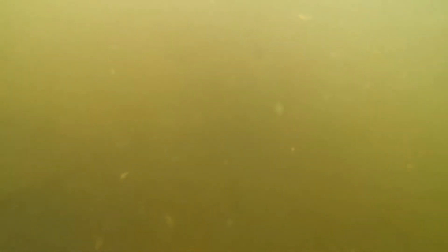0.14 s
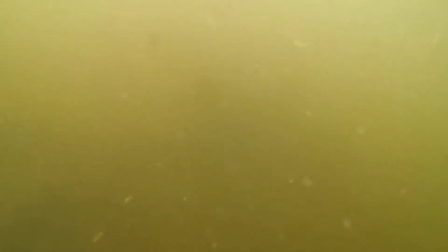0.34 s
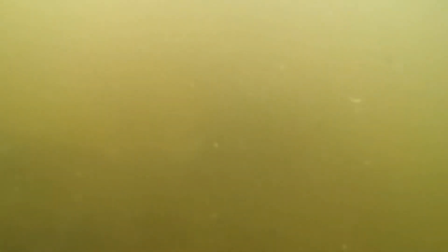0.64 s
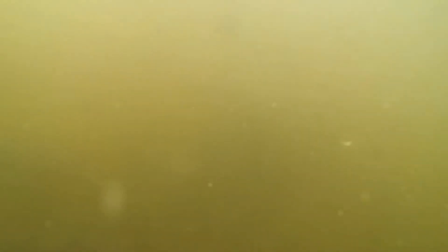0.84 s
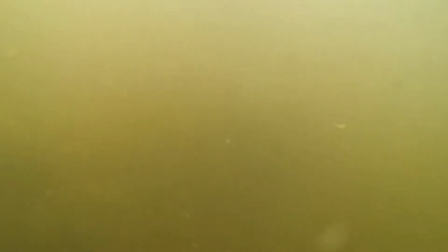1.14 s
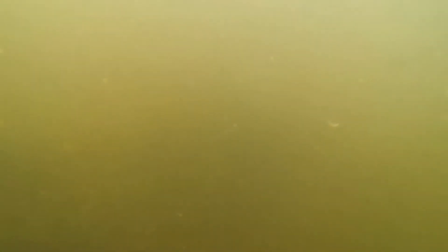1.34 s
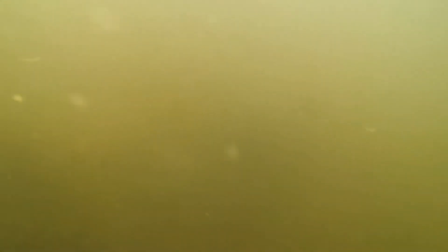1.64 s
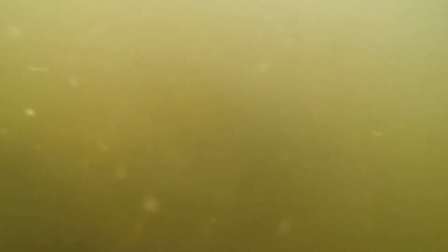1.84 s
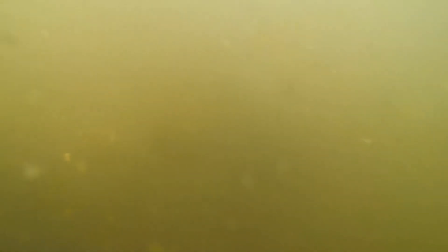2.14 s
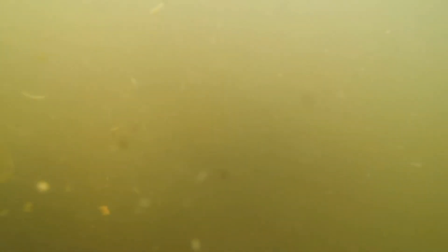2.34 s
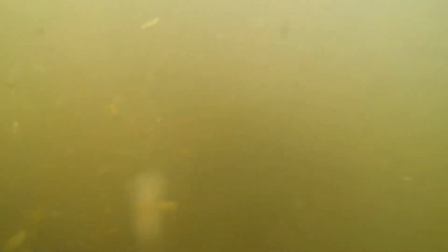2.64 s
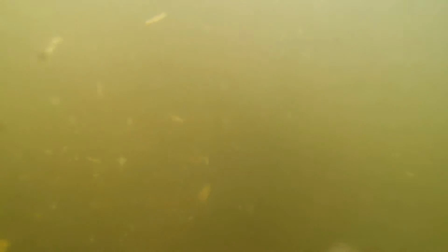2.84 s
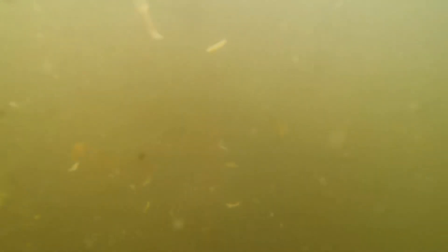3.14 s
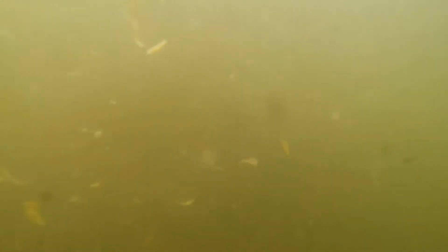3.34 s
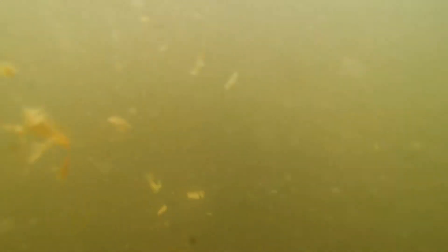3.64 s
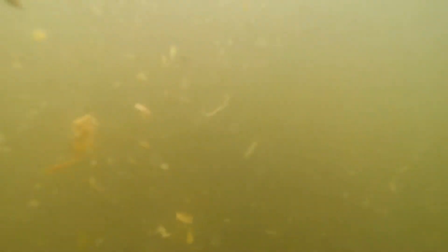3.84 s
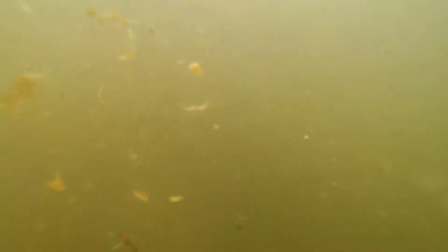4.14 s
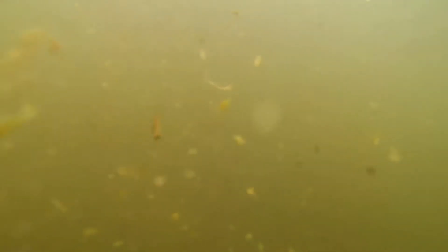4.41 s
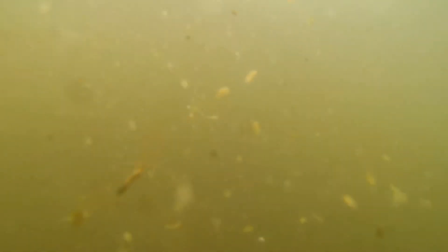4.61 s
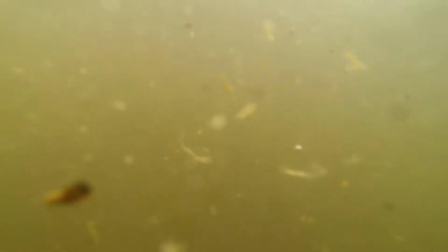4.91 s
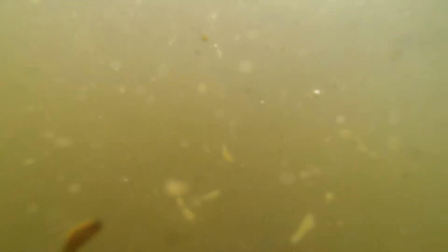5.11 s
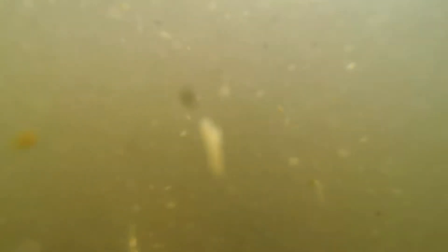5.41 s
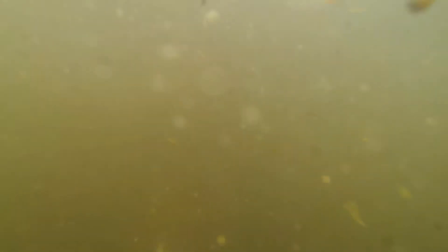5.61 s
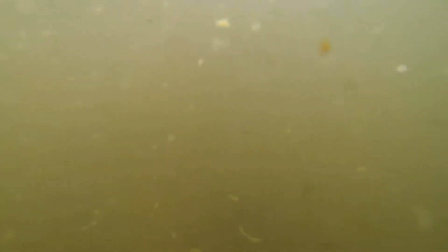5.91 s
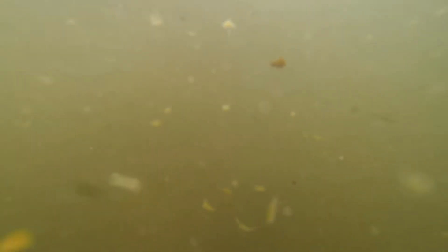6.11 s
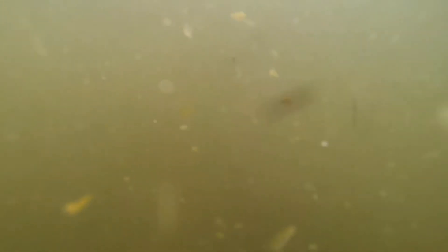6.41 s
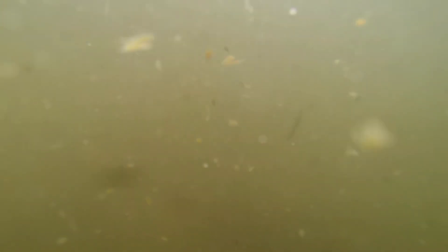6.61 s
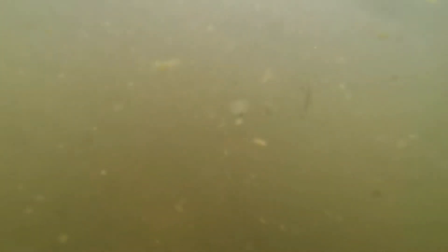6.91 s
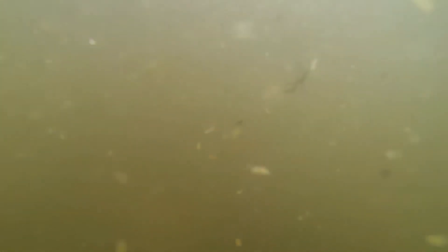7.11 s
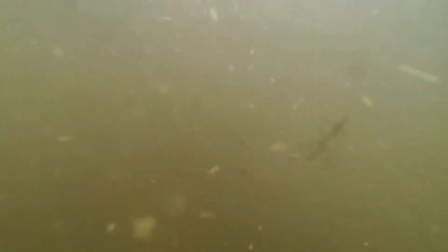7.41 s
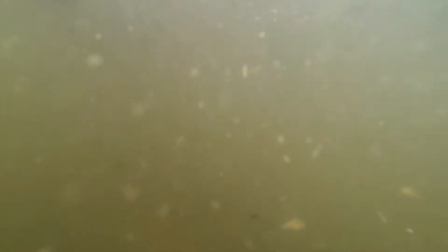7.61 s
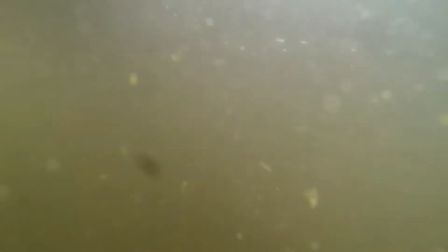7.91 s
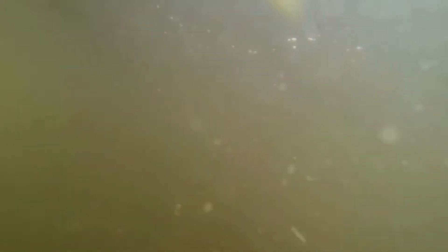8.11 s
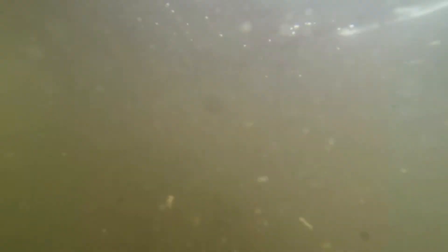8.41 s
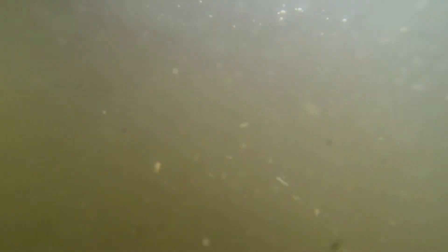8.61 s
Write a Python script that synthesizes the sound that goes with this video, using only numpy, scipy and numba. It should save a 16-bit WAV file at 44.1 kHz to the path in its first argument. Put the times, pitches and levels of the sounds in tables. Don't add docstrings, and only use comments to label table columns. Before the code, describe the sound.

Underwater, a motor-driven cutter whines and grinds harshly in a short burst, stalls, restarts for a long uneven run, then leaves engine throb and clicks.

```python
import sys
import numpy as np
from scipy import signal
from scipy.fft import rfft, irfft
from scipy.io import wavfile
from scipy.ndimage import uniform_filter1d
from numba import njit

SR = 44100
rng = np.random.default_rng(int(sys.argv[2]) if len(sys.argv) > 2 else 0)


def gain_from_decibels(decibels):
    exponent = np.asarray(decibels, float) / 20
    return 10 ** exponent


def store_pcm(level_fs):
    pcm = np.round(np.clip(level_fs, -1, 1) * 32767).astype(np.int16)
    wavfile.write(sys.argv[1], SR, np.atleast_2d(pcm).T)


N = 385875
TIME = np.arange(N) / SR
LONG_CUT_S = 3


def level(x, db):
    return x * gain_from_decibels(db) / np.sqrt(np.mean(x ** 2))


def band(x, lo_hz, hi_hz):
    return signal.sosfilt(signal.butter(3, [lo_hz, hi_hz], "bandpass", fs=SR, output="sos"), x)


def fine(x):
    return np.repeat(x, repeats=16)[:N]


def wander(rate_hz):
    held = np.repeat(rng.standard_normal(int(N / SR * rate_hz) + 2), 4)
    soft = uniform_filter1d(uniform_filter1d(held, size=4), size=4)
    return 1.3 * np.interp(TIME[::16] * rate_hz * 4, np.arange(len(soft)), soft)


def walk(rate_hz):
    return fine(wander(rate_hz))


def hump(start_s, length_s):
    out, k = np.zeros(N), int(length_s * SR)
    out[int(start_s * SR):][:k] = np.sin(np.pi * np.arange(k) / k)
    return out


def play(tables):
    rows = np.concatenate(tables)
    gate = sum((TIME >= t[0][0]) & (TIME < t[-1][0]) for t in tables)
    return uniform_filter1d(1. * gate, 200), [np.interp(TIME, rows[:, 0], c) for c in rows.T[1:]]


@njit
def svf(x, hz, width):
    y, b, l = np.empty(len(x)), 0., 0.
    for i in range(len(x)):
        g, k = np.pi * hz[i] / SR, width / hz[i]
        g = g + g ** 3 / 3 + 2 * g ** 5 / 15 + 17 * g ** 7 / 315
        v = (b + g * (x[i] - l)) / (1 + g * (g + k))
        b, l, y[i] = 2 * v - b, l + 2 * g * v, k * v
    return y


def ring(x, modes, drift, sway_db):
    total = 0
    for k, (hz, width, db) in enumerate(modes):
        strength = fine(gain_from_decibels(db + sway_db * wander(2.92)))
        total = total + (-1) ** k * strength * svf(x, hz * (1 + drift * walk(2.05)), 1. * width)
    return level(total, 0)


def grit(rate_hz, spread_db, smooth_db):
    hit = rng.random(N) < rate_hz / SR
    size = np.minimum(rng.exponential(size=N), 5)
    noise = rng.standard_normal(N)
    impacts = level(hit * np.sign(noise) * gain_from_decibels(spread_db * size), 0)
    return level(impacts + gain_from_decibels(smooth_db) * noise, 0)


# pitch_hz, density_db (per Hz)
MIC_NOISE = [(180, -43), (300, -7.5), (420, -3.5), (650, -4.5), (980, -17), (2760, -14), (7000, -25.5),
             (15300, -31.5)]


def circuit():
    hz, db = np.transpose(MIC_NOISE)
    shape = gain_from_decibels(np.interp(np.log(np.fft.rfftfreq(N, 1 / SR) + 1), np.log(hz), db))
    noise = irfft(rfft(rng.standard_normal(N)) * shape, N)
    frame_hz, noise_db = 29.97, -76
    frames = np.exp(1.4 * (np.cos(2 * np.pi * (frame_hz * TIME + .2)) - 1))
    frames = frames * np.clip(walk(150) + 0.32, 0, 3)
    crackle = frames * (band(noise, 7000, 7300) + 1.5 * band(noise, 10700, 13000))
    return (noise + 1.6 * crackle) * gain_from_decibels(noise_db - 1.5) / np.std(band(noise, 8300, 16000))


# peak_s, peak_db
WATER_SURGES = [(0, -37), (0.97, -36), (1.49, -31), (1.9, -43), (3.09, -41), (3.85, -42), (4.82, -42.5),
                (5.38, -34.5), (5.8, -44), (6.07, -44), (7.6, -44), (7.99, -43), (8.43, -30), (8.76, -24)]
# centre_hz, width_hz, level_db
FAR_HISS_BEFORE = [(700, 360, 8.5), (1700, 500, 4.5), (2900, 1600, 3), (5000, 2000, -18.5)]
FAR_HISS_AFTER = [(700, 570, -9.5), (1400, 150, -6), (1680, 140, -3), (2565, 170, -4), (2820, 154, 2.5),
                  (3310, 240, 0), (4160, 900, -13), (5135, 170, 0), (6510, 410, -15)]


def water():
    t = TIME[::16]
    swell_db_s, ebb_db_s = 153, 111
    surge = 0
    for peak_s, db in WATER_SURGES:
        slope = np.where(t < peak_s, swell_db_s, ebb_db_s)
        surge = surge + gain_from_decibels(db - slope * np.abs(t - peak_s))
    calm_db, duck_db = -48, -7.5
    calm = gain_from_decibels(calm_db + duck_db * play(MOTOR_RUNS)[0])
    slosh = level(band(rng.standard_normal(N), 16, 50), 0) * (fine(surge) + calm)
    rumble = level(band(rng.standard_normal(N), 60, 222), -58)
    before = gain_from_decibels(-68.5) * ring(grit(1500, 2.8, 3), FAR_HISS_BEFORE, 0.019, 2.1)
    before *= np.clip(TIME / 0.39, 0, 1) ** 2
    after = gain_from_decibels(-55.5) * ring(grit(1500, 2.8, 3), FAR_HISS_AFTER, 0.019, 2.1)
    return slosh + rumble + np.where(TIME < LONG_CUT_S, before, after) * gain_from_decibels(1.1 * walk(10))


# time_s, level_db
ENGINE_LEVEL = [
    (0, -62),
    (1.899, -55.5),
    (5.5, -55),
    (8.75, -49),
]
# share_of_turn, level_db
ENGINE_FIRINGS = [(.0, -4), (.11, -2.5), (.4, -10.5), (0.582, 5.5), (0.786, 5.5)]


def idling():
    s, db = np.transpose(ENGINE_LEVEL)
    turns_hz = np.where(TIME < LONG_CUT_S, 24.0, 28.778)
    turns = np.cumsum(turns_hz) / SR + .3 + .001 * walk(6)
    kicks = 0
    for at, size_db in ENGINE_FIRINGS:
        kicks = kicks + gain_from_decibels(size_db + .4 * walk(20)) * np.diff(np.floor(turns - at), prepend=-1)
    t = np.arange(-300, 600) / SR
    peak = np.exp(-t / 0.0026) * np.cos(2 * np.pi * 200 * t)
    dip = 0.63 * np.exp(-t / 0.0022) * (1 - np.exp(-t / 0.00018))
    pulse = np.where(t < 0, np.exp(t / 0.00073), peak - dip)
    throb = level(band(signal.fftconvolve(kicks, pulse, "same"), 45, 1500), 0)
    return throb * gain_from_decibels(np.interp(TIME, s, db))


# start_s, peak_db, centre_hz,
# length_s
WEED_DRAGS = [(0, -35, 700, 0.018), (0.9, -47, 600, 0.048), (5.611, -48.5, 1402, 0.014),
              (5.684, -47, 1190, .015), (5.697, -48, 1100, 0.047), (5.825, -35.5, 915, 0.028),
              (6.052, -54, 1200, 0.027), (6.299, -55, 1200, 0.028), (8.426, -47, 1200, 0.023),
              (8.481, -52, 1100, 0.024), (8.715, -44.5, 940, 0.022)]


def scrapes():
    out = np.zeros(N)
    for s, db, hz, length_s in WEED_DRAGS:
        k = int(length_s * SR)
        rub = rng.standard_normal(SR // 10) * gain_from_decibels(3.6 * rng.standard_normal(SR // 10))
        rub = level(band(rub, hz * 0.57, hz * 1.47), 0)[-k:]
        out[int(s * SR):][:k] += gain_from_decibels(db) * np.sin(np.pi * np.arange(k) / k) * rub
    return out


def struck(events, rough, glide, blow, trim_db):
    out, t = np.zeros(N + SR), TIME[:SR // 2]
    for s, db, hz, t60 in events:
        fade = np.exp(-np.log(1000) * t / t60)
        angle = 2 * np.pi * hz * t * (1 + glide * fade)
        rasp = band(rng.standard_normal(len(t)), hz * 0.8, hz * 1.59) * np.sqrt(SR / hz / 4)
        wave = (np.sin(angle) + rough * rasp) * (1 - np.exp(-t * hz * 3))
        wave = wave - blow * (1 - np.cos(angle)) * np.exp(-t / 0.0032)
        out[int(s * SR):][:len(t)] += gain_from_decibels(db + trim_db) * wave * fade
    return out[:N]


# start_s,
# peak_db, pitch_hz, t60_s
TICKS_AND_CHIRPS = [(1.647, -42, 866.9, 0.019), (4.308, -14, 1750, 0.049), (5.56, -5, 1220, 0.025),
                    (5.766, -46, 673, 0.021), (6.945, -46, 1316, 0.022), (6.959, -40, 1370, 0.025),
                    (7.128, -42, 2020, 0.025), (7.155, -49, 1082, 0.025), (7.171, -34, 2600, 0.026),
                    (7.684, -39.5, 1400, 0.023), (7.876, -45, 2900, 0.029),
                    (5.5442, -13.5, 1795, 0.056),
                    (5.882, -43.5, 6990, 0.01),
]
HARD_KNOCKS = [
    (6.05, -20.5, 960, 0.015),
    (6.293, -25, 925, 0.015),
    (7.248, -48, 950, 0.02),
    (8.412, -28.5, 940, 0.024),
    (8.564, -41, 915, 0.02),
]
SOFT_BUMPS = [
    (0.004, -21, 87, 0.059),
    (0.97, -23, 45.8, 0.12),
    (1.44, -18, 72, 0.074),
    (1.889, -27.5, 45.9, 0.11),
    (6.052, -28, 39.99, 0.1),
    (6.294, -26.5, 80.7, 0.078),
    (7.252, -27, 35.0, 0.057),
    (8.42, -19, 45.8, 0.07),
    (8.724, -19, 46, 0.1),
]


def debris():
    ticks = struck(TICKS_AND_CHIRPS, rough=0.26, glide=0.08, blow=0, trim_db=1.6)
    hard = struck(HARD_KNOCKS, rough=1.0, glide=0.24, blow=1.45, trim_db=0.)
    soft = struck(SOFT_BUMPS, rough=.1, glide=1.0, blow=0, trim_db=3.0)
    return ticks + hard + soft


# time_s, pitch_hz, load_db, octave_db (over first partial)
MOTOR_RUNS = [
    [(0.96, 360.1, -33.5, 12), (1.2, 448, -40.5, 1), (1.35, 441.7, -35.5, 0), (1.375, 417, -27, -11),
     (1.44, 460, -25, -3.5), (1.46, 442, -40, -7.5)],
    [(1.89, 405.2, -36, -1.5), (2.1, 400, -39, 2), (2.2, 424.7, -31, -10), (2.33, 395.3, -30.5, 1.5),
     (2.42, 477.7, -32, 11), (2.92, 480, -30, 10.5), (3.07, 370.2, -36, 11)],
    [(3.07, 345.2, -33, 7), (3.2, 365.2, -34, 7), (3.6, 335, -33, 8), (3.92, 344.9, -30.5, 1.5),
     (4.09, 395.7, -31.5, 0), (4.27, 372, -30, 3.5), (4.36, 438.2, -30.5, 3.5)],
    [(4.36, 437.5, -29, 3), (4.62, 392.2, -28.5, -5.5), (4.82, 439.7, -28.5, 3), (4.97, 386.5, -29.5, -1.5),
     (5.3, 380.2, -25, 7), (5.46, 477.8, -26, -9.5), (5.57, 465, -26, -1)],
]


def shaft():
    hz = play(MOTOR_RUNS)[1][0]
    return np.cumsum(hz * (1 + .02 * walk(45) + .025 * walk(160))) / SR


def partials():
    _, load_db, octave_db = play(MOTOR_RUNS)[1]
    first_db = load_db - 9 - 0.37 * octave_db
    return first_db, first_db + octave_db


# centre_hz, width_hz, level_db
LOW_BODY = [(388, 220, -10.5), (717, 124, 0), (940, 82, -2), (1257, 58, -2.5)]
SWITCH_ONS = [
    0.94,
    1.89,
]


def motor(turns):
    gate, (_, load_db, _) = play(MOTOR_RUNS)
    first_db, second_db = partials()
    angle = 2 * np.pi * turns
    tone = gain_from_decibels(first_db + 3.0 * walk(50)) * np.sin(angle)
    tone += gain_from_decibels(second_db + 2.9 * walk(60)) * np.sin(2 * angle)
    tone += gain_from_decibels(second_db - 21.0) * np.sin(angle / 2)
    growl = band(ring(grit(1500, 2.8, -0.5), LOW_BODY, 0.023, 1.1), 260, 1450)
    jolt_db = sum(12 * (TIME >= s) * np.exp(-np.abs(TIME - s) / 0.044) for s in SWITCH_ONS)
    return gate * (1.29 * tone + gain_from_decibels(load_db + jolt_db - 2.5 + 1.3 * walk(40)) * growl)


def chatter(turns):
    halves = (2 * turns).astype(int)
    chance = rng.standard_normal((N // 30, 2))
    size = (np.sign(chance[:, 0]) * gain_from_decibels(4.14 * np.clip(chance[:, 1], -3, 2)))[halves]
    second = np.clip(gain_from_decibels(play(MOTOR_RUNS)[1][2] - 5), 0, 1)
    weak = np.where(halves % 2, second, 1)
    rasp = 0.28 * rng.standard_normal(N) * np.exp(-(2 * turns % 1) / 0.19)
    return level(size * weak * (np.diff(halves, prepend=0) + rasp), 0)


# time_s, slip_share (0-1)
SLIP_SHARE = [
    (1, .45),
    (3, .45),
    (3.2, .7),
    (5.5, .55),
]


def blade_push(turns):
    share = np.interp(TIME, *np.transpose(SLIP_SHARE))
    push = np.sqrt(share) * chatter(turns) + np.sqrt(1 - share) * grit(3000, 2.5, 0)
    return push * gain_from_decibels(1.14 * walk(70))


# start_s, bite_db, sag_db_per_s, sharpness_db
BLADE_BITES = [(0, -19, 1600, 0), (0.965, -13, 42.5, 4), (1.134, -15.5, 17.5, 3), (1.3, -18, -15, 2.5),
               (1.445, -36.5, 190, -3), (1.887, -14, 4, 3.5), (2.2, -15, 32, -1), (2.305, -15, 8.5, -2),
               (2.6, -16.5, -3.5, -0.5), (3.075, -16, 202, 0), (3.125, -15, 17.5, 0), (3.52, -19.5, 5, 0),
               (3.705, -13, 83, 0), (3.85, -14.5, 17.5, 0), (4.11, -14, 29.5, -3), (4.43, -19, -27, -1.5),
               (4.66, -14, 20, -2), (4.92, -16, 5, 1.5), (5.3, -15.5, 15, 3), (5.5, -16, 6, 2),
               (5.561, -25.5, 847.5, -2)]


def bites():
    starts = np.transpose(BLADE_BITES)[0]
    row = np.searchsorted(starts, TIME, "right").clip(1) - 1
    s, bite_db, sag, sharp_db = np.transpose(BLADE_BITES)[:, row]
    return np.maximum(bite_db - sag * (TIME - s), -100), uniform_filter1d(sharp_db, SR // 20)


# start_s, depth_db, length_s
BLADE_SKIPS = [
    (1.112, -4.5, 0.02),
    (2.282, -6.5, 0.024),
    (3.028, -10, 0.049),
    (3.431, -5.5, 0.015),
    (3.684, -5, 0.025),
    (3.818, -2, 0.032),
    (4.292, -2, 0.014),
]
# start_s, peak_db, length_s
GRIT_SCUFFS = [
    (0.133, -47, 0.032),
    (0.902, -40.5, 0.03),
    (1.4765, -33.5, 0.018),
    (1.512, -42, 0.013),
    (1.563, -40, 0.031),
    (1.688, -39, 0.019),
    (5.724, -40, 0.016),
    (6.855, -47, 0.017),
    (7.683, -44, 0.017),
    (7.978, -53, 0.02),
]


def blade_force(db):
    skips_db = sum(depth_db * hump(s, length_s) for s, depth_db, length_s in BLADE_SKIPS)
    force = uniform_filter1d(gain_from_decibels(db), int(0.0089 * SR)) * gain_from_decibels(skips_db)
    for s, peak_db, length_s in GRIT_SCUFFS:
        force += gain_from_decibels(peak_db - 9.5) * np.sqrt(hump(s, length_s))
    return force


# time_s, main_peak_hz
HOUSING_GRIP = [
    [(0.95, 2940), (2.1, 3040), (2.45, 2790), (2.7, 2975), (3.65, 2650), (4.35, 2650), (4.58, 3173),
     (5.4, 2680), (5.6, 2710)],
]
# centre_hz, width_hz, level_db
LOWER_SHELL = [(1619, 160, -1.8), (1831, 121, -0.22)]
MAIN_SHELL = [(2568, 356, -0.93), (3350, 270, -0.92)]
UPPER_SHELL = [(3800, 760, 12), (4390, 400, -0.5), (4700, 290, -3.5), (5260, 250, -4), (5800, 310, -2),
               (6810, 700, -5)]
TREBLE_SHELL = [(7270, 730, 7.9), (7960, 580, 12.8), (9050, 1100, 2.4)]
AIR_SHELL = [(10060, 500, -3.5), (10900, 450, -1), (12700, 770, -7.5), (13950, 500, -12)]


def cutter(turns):
    db, sharp_db = bites()
    full_db, side_share = -13.5, 0.69
    kept_db = side_share * np.clip(full_db - db, -3, 9)
    load_db = play(MOTOR_RUNS)[1][1] + 32.5
    main_hz = play(HOUSING_GRIP)[1][0]
    push = blade_push(turns)
    main = ring(push, MAIN_SHELL, 0.013, 1.13) + 0.6 * level(svf(push, main_hz, 330.0), 0)
    upper = ring(push, UPPER_SHELL, 0.019, 2.1) + 0.28 * level(svf(push, 1.765 * main_hz, 300.0), 0)
    lower = band(ring(push, LOWER_SHELL, 0.026, 1.9), 1200, 2060)
    treble = band(ring(push, TREBLE_SHELL, 0.038, 1.3), 6800, 10300)
    air = band(ring(push, AIR_SHELL, 0.025, 2.2), 9000, 16000)
    side = gain_from_decibels(-13 + 0.59 * load_db + walk(25)) * lower
    side += gain_from_decibels(-12.5 + sharp_db) * band(upper, 3240, 6980)
    side += gain_from_decibels(-25 + 1.5 * sharp_db) * treble
    side += gain_from_decibels(-34 + 1.6 * sharp_db) * air
    thud = level(band(grit(400, 3.3, -3.5), 50, 156), -35.5)
    shell = level(band(main, 2285, 3537), 0) + gain_from_decibels(kept_db) * side + thud
    return blade_force(db) * shell


def scene():
    turns = shaft()
    background = circuit() + water() + idling()
    return (background + scrapes() + debris() + motor(turns) + cutter(turns))[None]


def roll_off(x):
    return signal.sosfilt(signal.butter(12, 15430, fs=SR, output="sos"), x)


def record(dry):
    top = signal.butter(10, 14800, fs=SR, output="sos")
    mix = signal.sosfilt(top, np.tanh(0.69 * dry) / 0.71)
    return roll_off(mix)


dry = scene()
out = record(dry)
store_pcm(out)
```